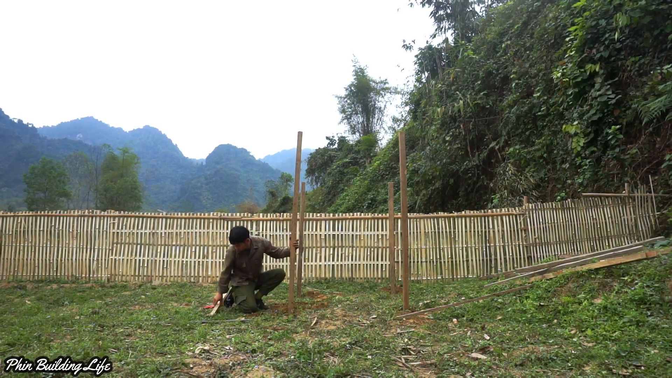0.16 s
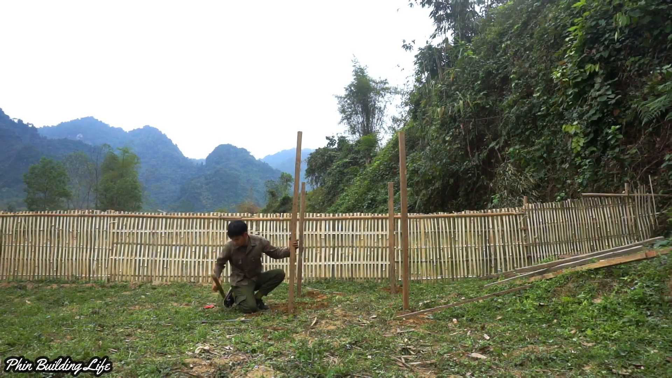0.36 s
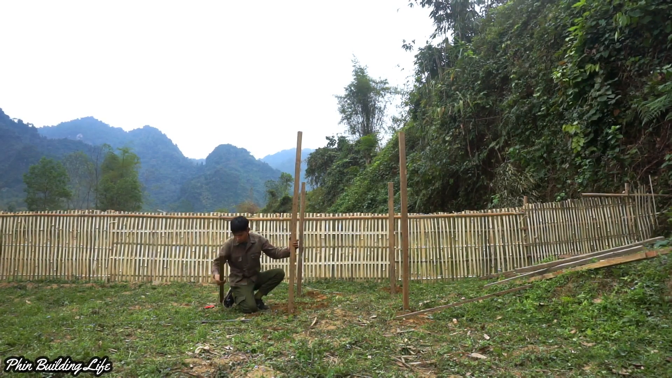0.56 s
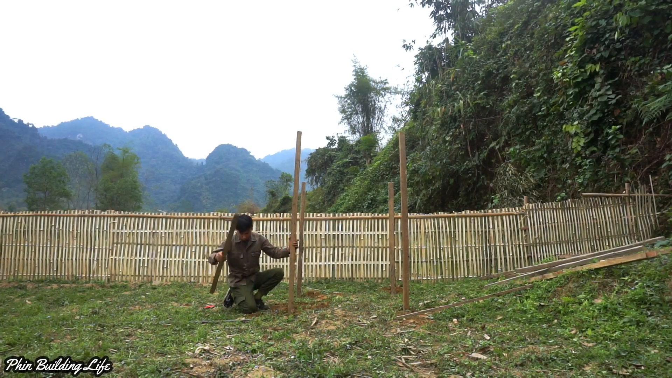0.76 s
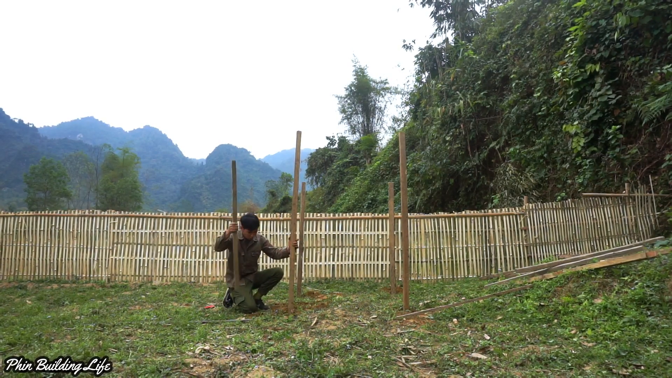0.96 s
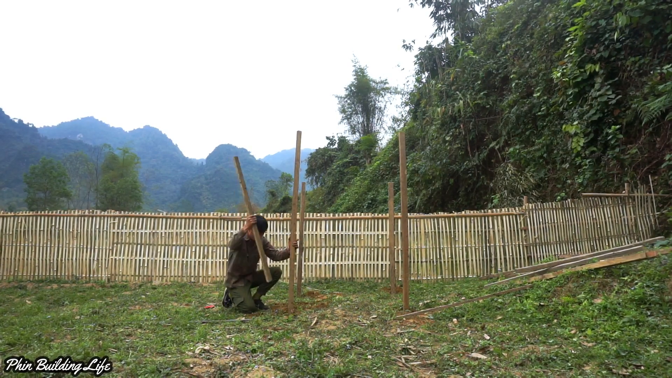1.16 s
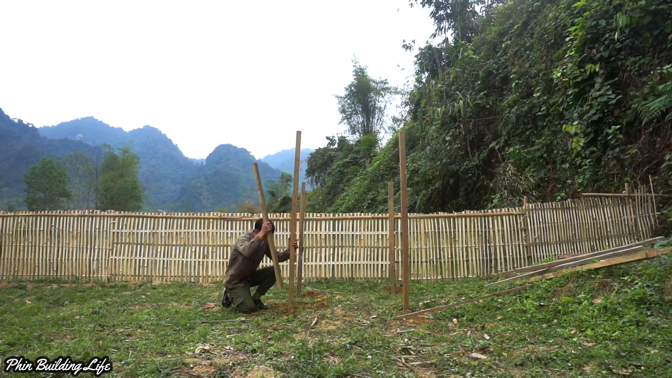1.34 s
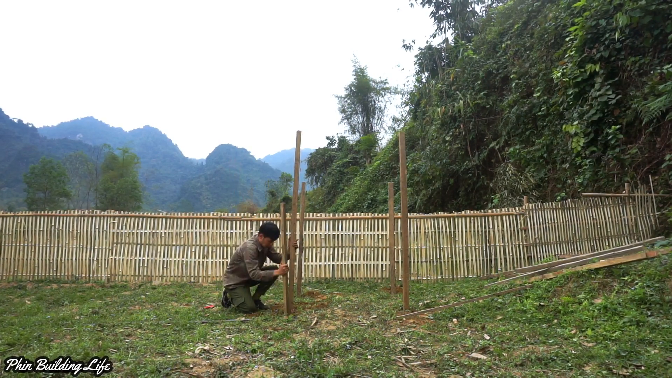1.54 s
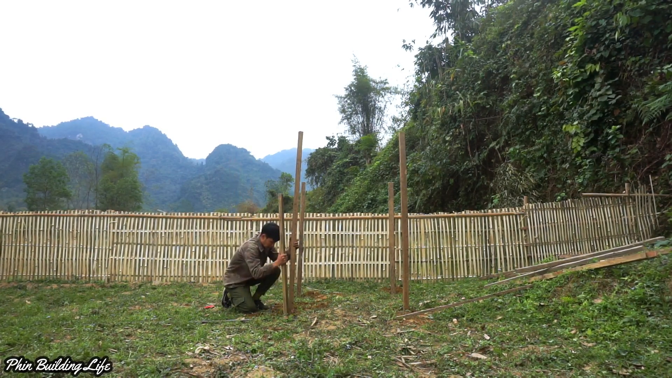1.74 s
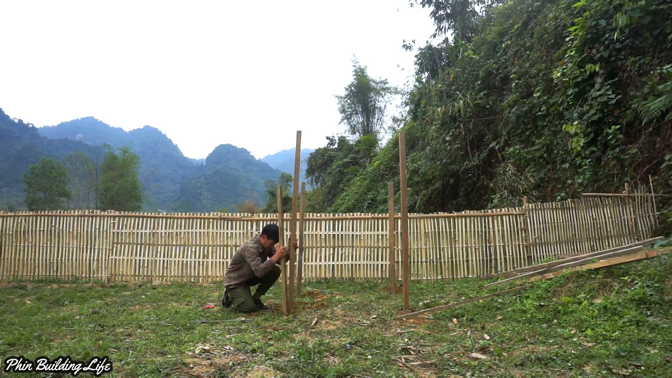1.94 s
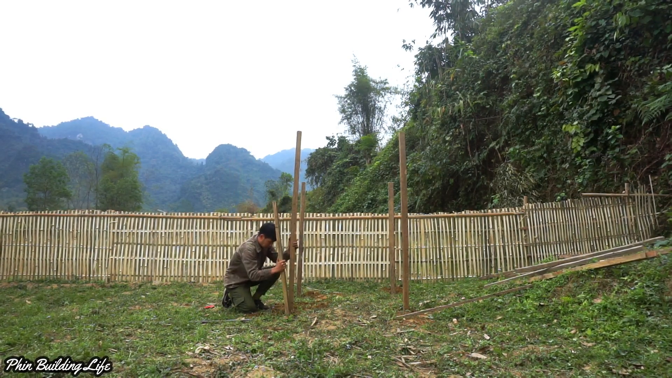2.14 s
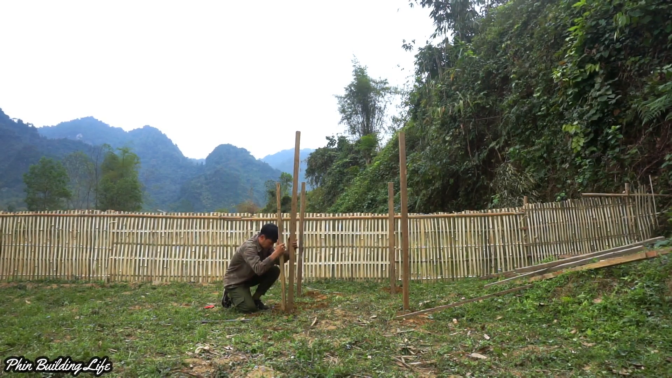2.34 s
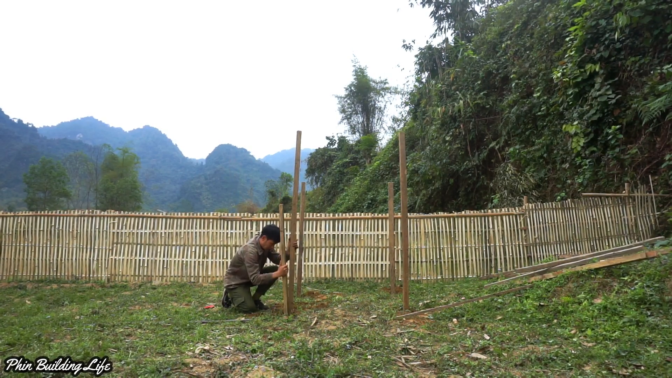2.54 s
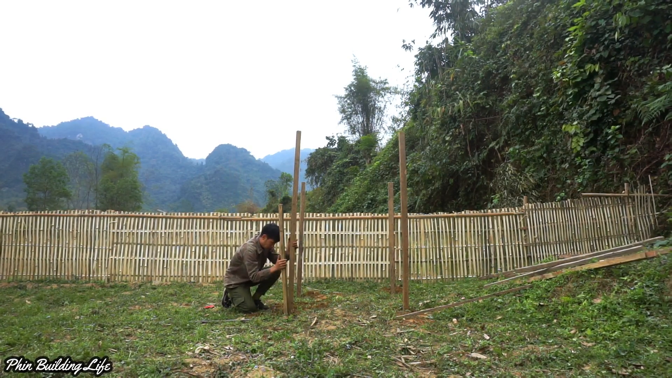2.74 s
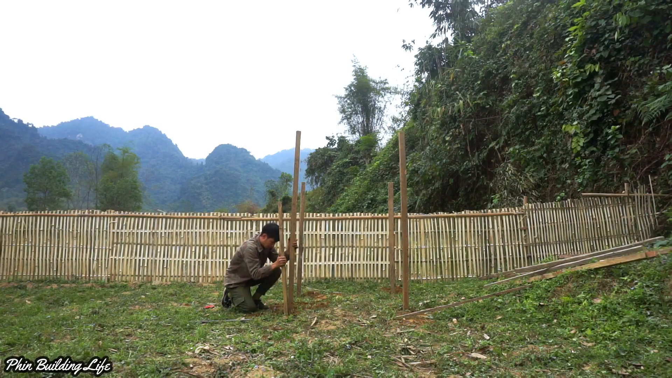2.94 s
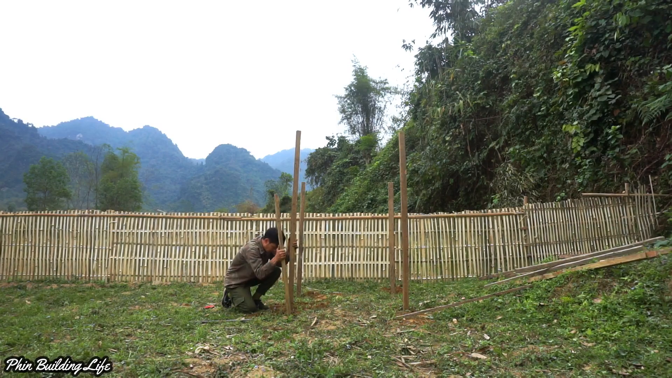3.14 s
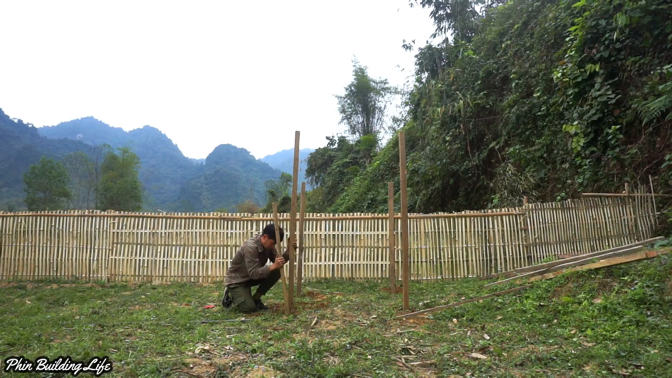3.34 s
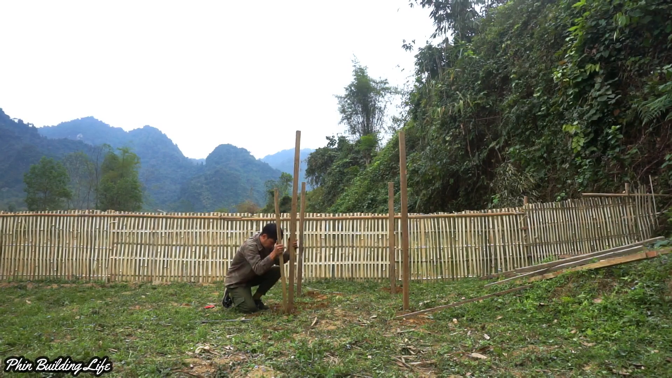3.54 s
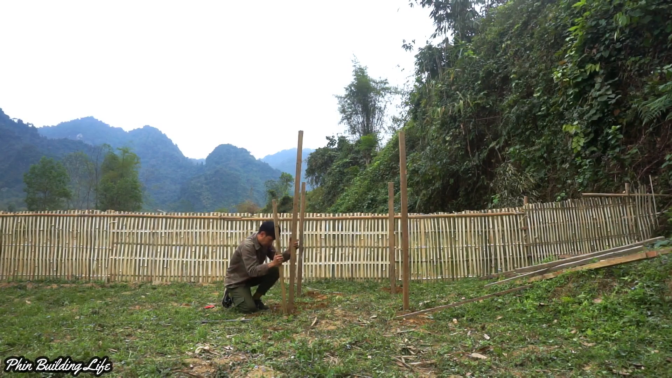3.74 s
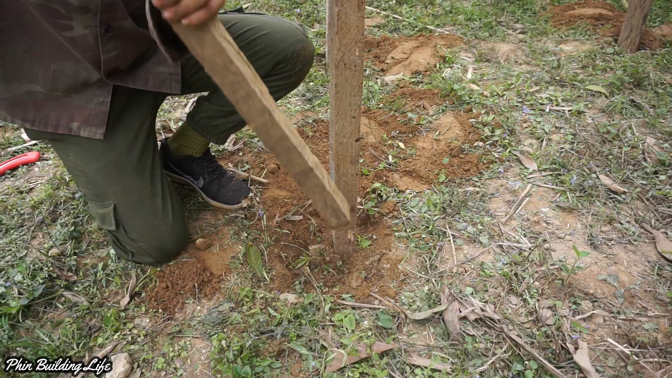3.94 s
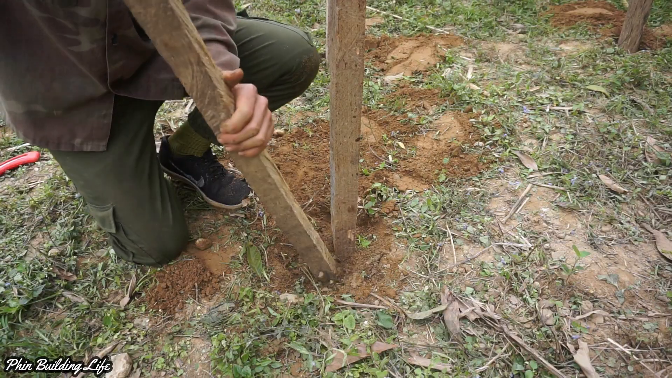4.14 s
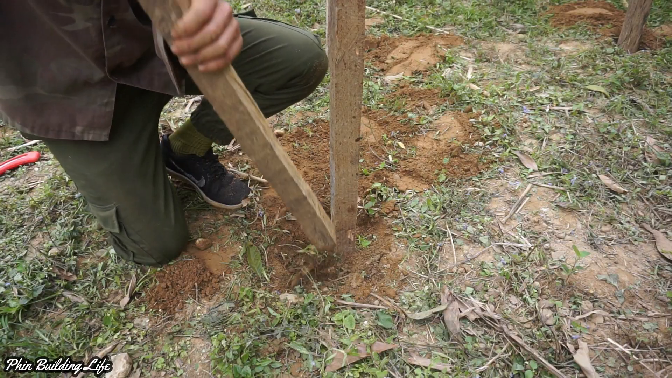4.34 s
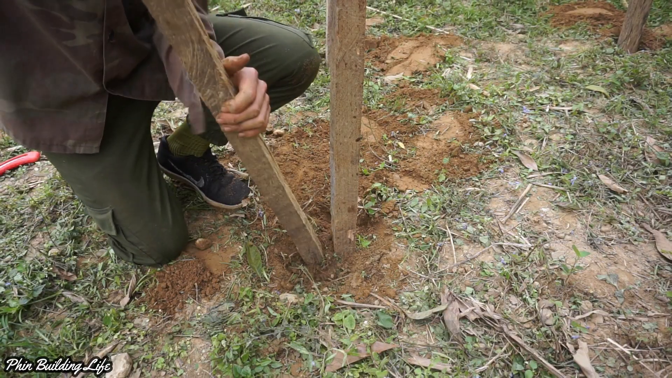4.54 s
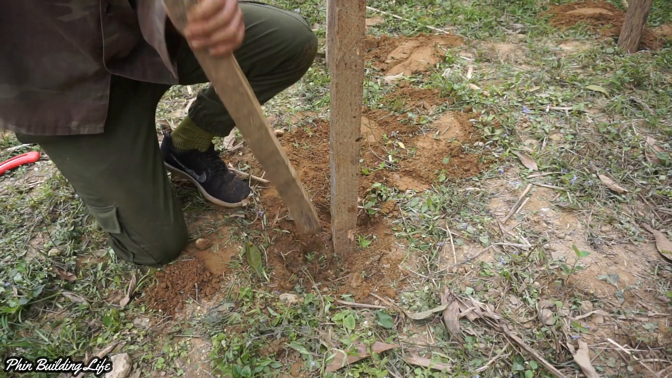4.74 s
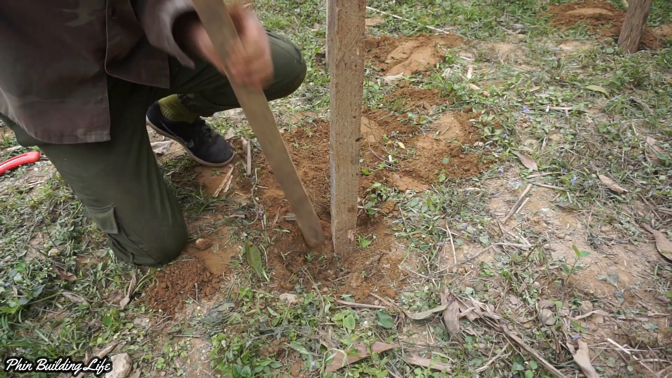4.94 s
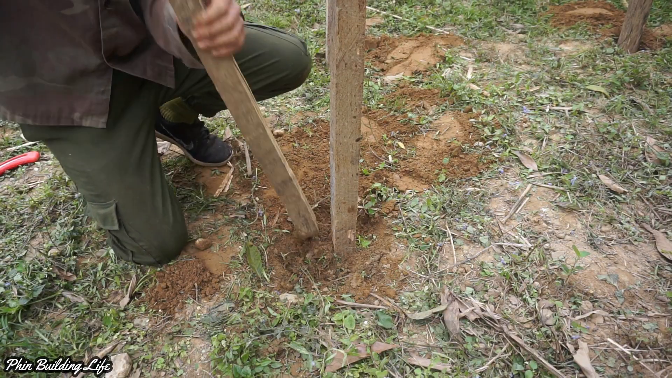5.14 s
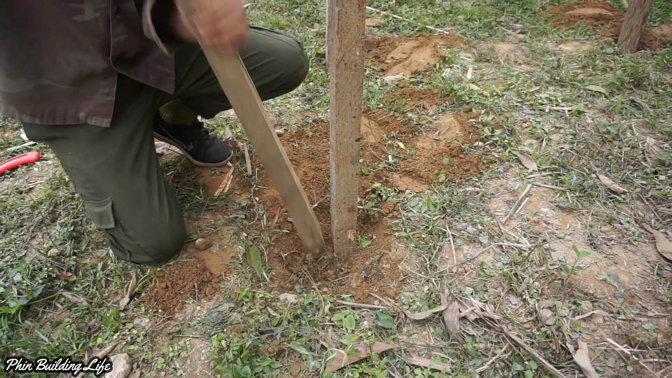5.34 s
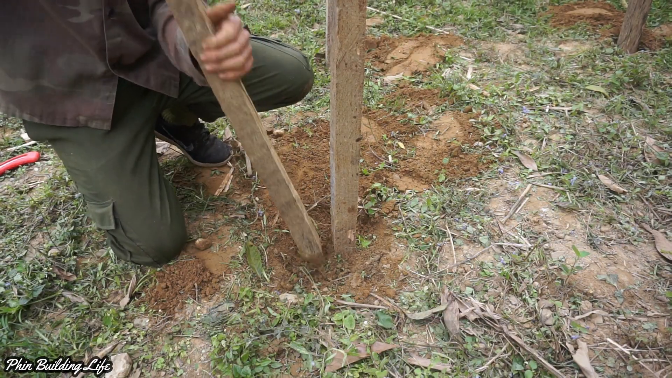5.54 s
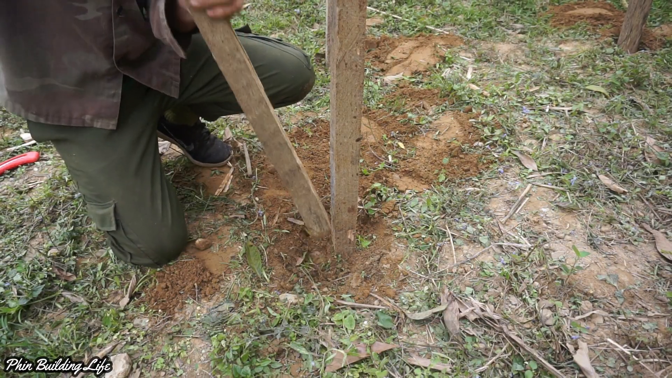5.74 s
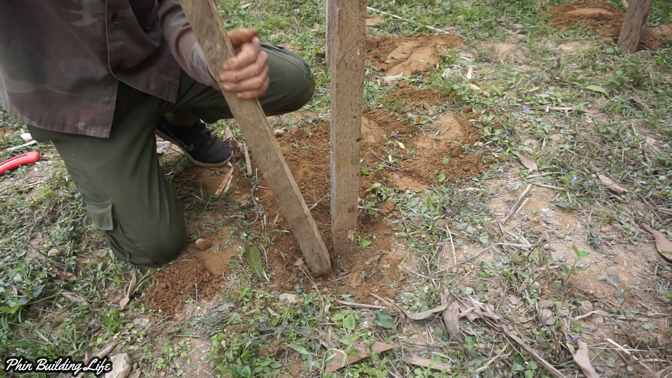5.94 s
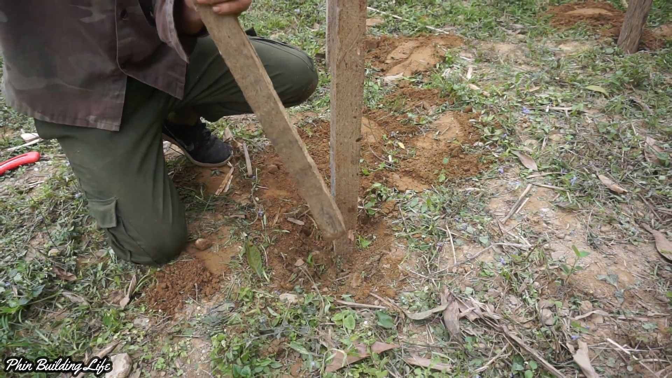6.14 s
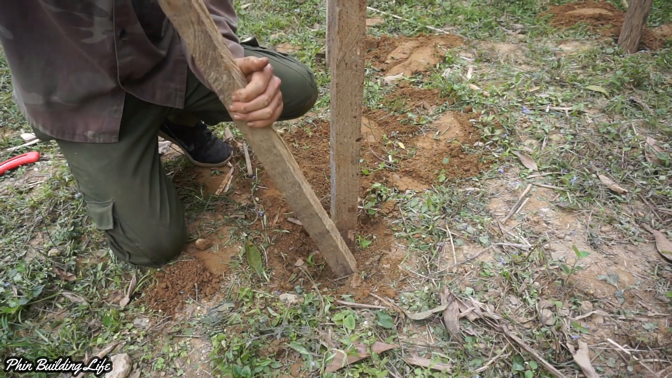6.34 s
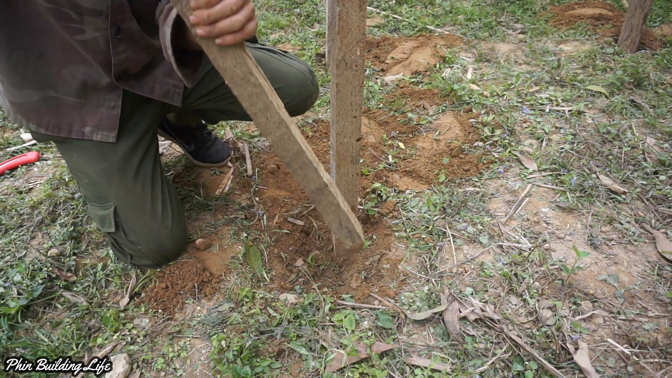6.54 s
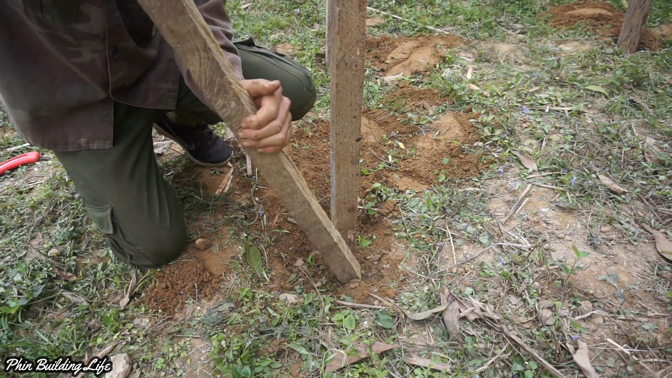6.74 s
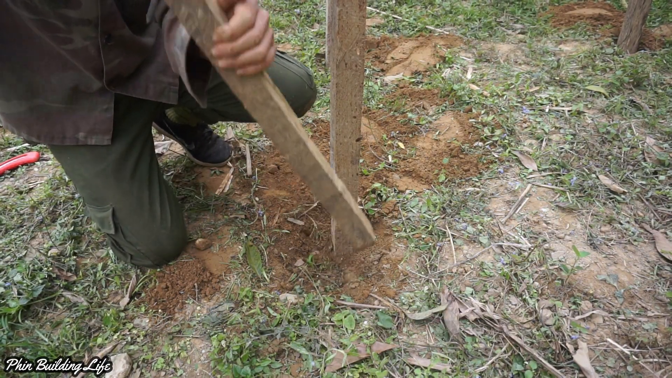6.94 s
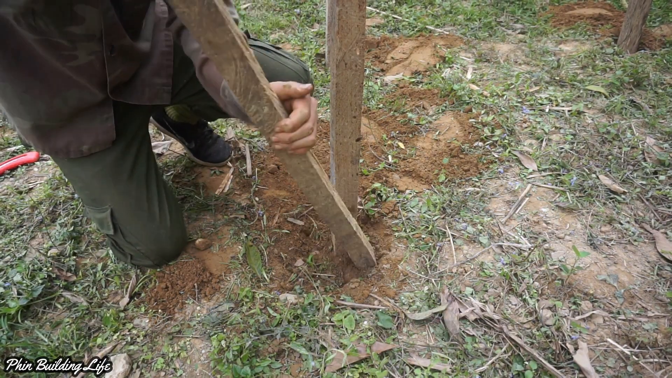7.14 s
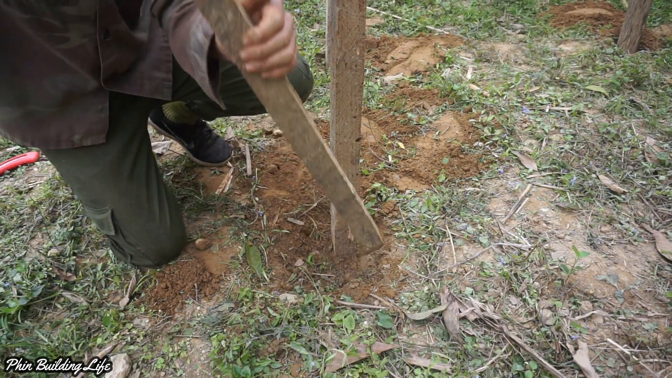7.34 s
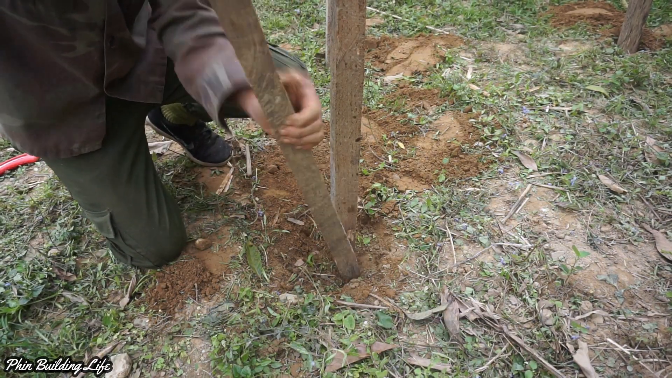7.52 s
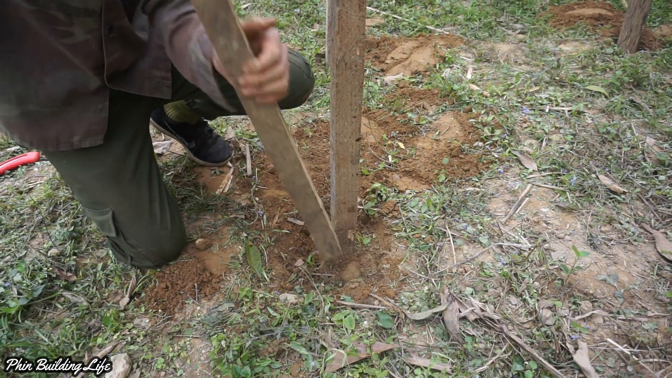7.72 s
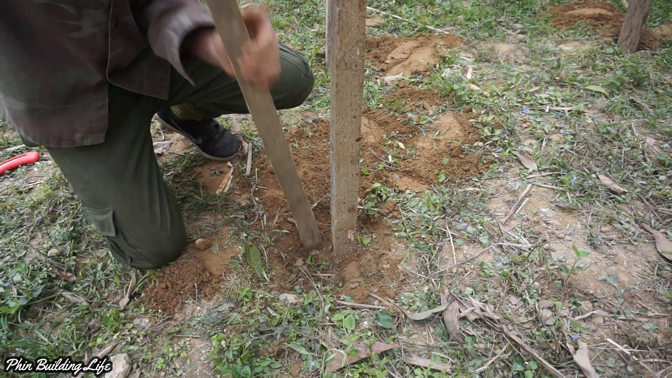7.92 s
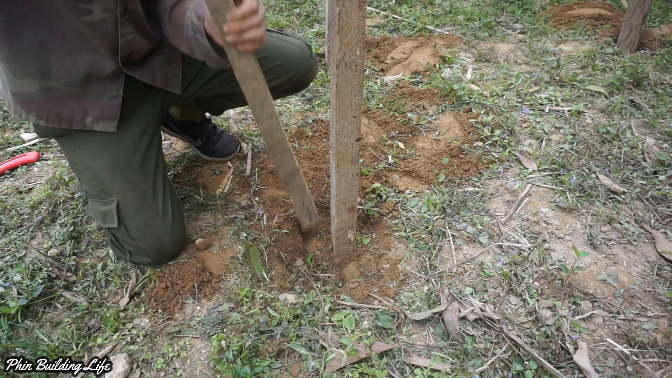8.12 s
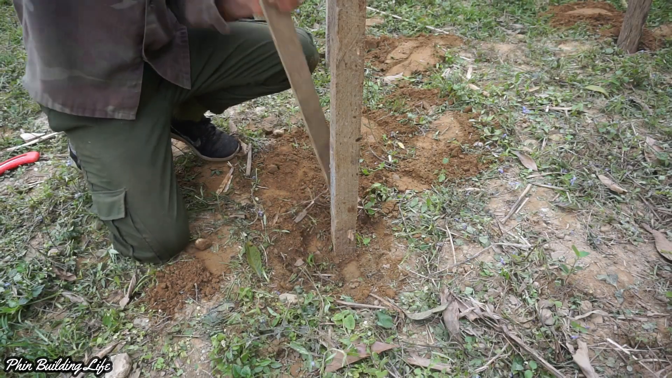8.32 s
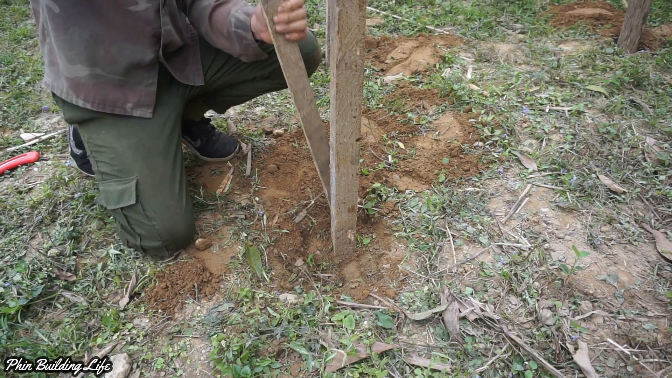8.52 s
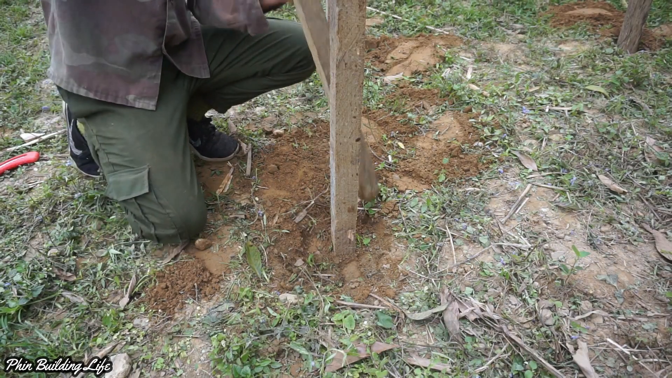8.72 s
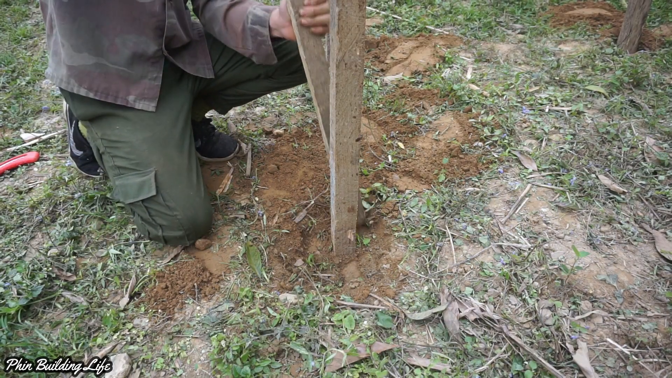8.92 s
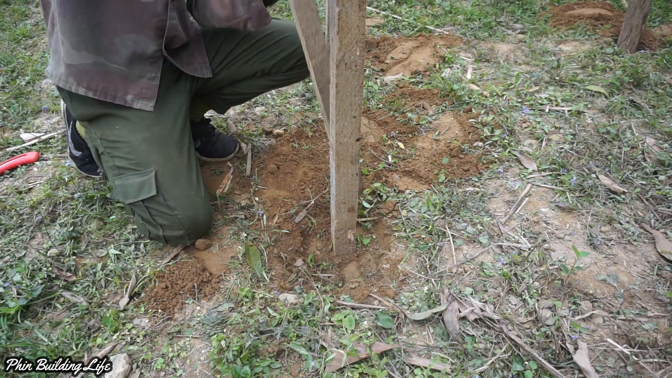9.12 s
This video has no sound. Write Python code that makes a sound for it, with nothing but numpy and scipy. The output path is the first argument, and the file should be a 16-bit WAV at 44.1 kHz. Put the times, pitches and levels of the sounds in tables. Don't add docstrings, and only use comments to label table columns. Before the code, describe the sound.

Faint distant taps in a quiet insect-filled field give way to close, heavy thuds of a stick tamping gritty earth, sometimes cracking against wood.

```python
import sys
import numpy as np
from scipy import signal
from scipy.fft import rfft, irfft, next_fast_len
from scipy.io import wavfile
from scipy.ndimage import uniform_filter1d

SR = 44100
rng = np.random.default_rng(int(sys.argv[2]) if len(sys.argv) > 2 else 0)


def nominal_scale(level):
    x = np.asarray(level, float) / 20
    return 10 ** x


def unload_audio(sound):
    columns = np.transpose(np.atleast_2d(sound))
    steps = np.round(np.clip(columns, -1, 1) * 32767)
    wavfile.write(sys.argv[1], SR, steps.astype(np.int16))


N = 404397
FAST = next_fast_len(N)

# hz, level_db
AIR = [(15, -45), (25, -5.5), (130, -3.5), (560, -7.5), (1300, -10), (3600, -15), (12900, -20.5),
       (16000, -23.5)]
# hz, correlation
AIR_SAME = [(60, 1), (130, 0.59), (290, -0.11), (640, -0.52), (1400, -0.51), (3100, -0.28), (6800, -0.0053)]
# time_s, treble_db
AIR_SWELL = [(0, -1), (1.4, -2.5), (2.2, -1), (3.9, -2), (4.3, 1), (5.3, 1), (6, -0.5), (7.5, -0.5),
             (8.2, 1), (9.17, -0.5)]
AIR_DB = -62

# time_s, level_db
CHORUS = [(0, -72), (1.3, -77), (1.7, -73), (2.63, -70), (3.75, -84), (4.01, -70), (4.31, -65.5),
          (5.0, -68.5), (6.3, -76), (6.9, -67), (7.41, -80), (8.2, -69), (8.6, -67), (9.17, -73)]
CHORUS_HZ = (4340, 3750)
CHORUS_WIDTH_HZ = (190, 150)
LOWER_STRAND_DB = -6
NEARER_S, SHIMMER_DB = 3.9, -73
KATYDID_S = [.83, 1.31, 1.79, 2.76, 5.17, 5.74, 8.53, 9.12]
KATYDID_HZ, KATYDID_DB = 11280, -77
# start_s, end_s, first_hz, last_hz, level_db
BIRD_CALLS = [
    (.1, .5, 1435, 1430, -76.5),
    (.6, 2.0, 1370, 1400, -77),
    (2.42, 2.76, 1085, 1056, -71.5),
]

# time_s, pitch_hz
CHIRP_HZ = [(0, 4010), (5, 3940), (5.8, 3930), (6.1, 3990), (6.6, 4035), (9.2, 4055)]
# first_chirp_s, last_chirp_s
PAIRS = [(.044, .421), (.581, .645), (.905, .905), (1.005, 1.07), (1.178, 1.263), (1.479, 1.564),
         (1.677, 1.677), (1.736, 1.961), (2.11, 2.11), (2.202, 2.276), (2.486, 2.549), (2.73, 2.73),
         (3.22, 3.3), (3.377, 3.467), (5.157, 5.37), (5.511, 5.802), (5.875, 6.173), (6.756, 6.837),
         (7.225, 7.465), (7.541, 7.776), (7.95, 8.025), (8.201, 8.354), (8.452, 8.535), (8.634, 9.12)]
# first_chirp_s, last_chirp_s
TRIPLES = [(.486, .486), (.732, .812), (2.327, 2.406), (2.672, 2.672), (6.249, 6.343), (6.448, 6.652),
           (6.928, 7.137), (7.853, 7.853), (8.102, 8.102)]
# time_s, right_peak_db
EFFORT = [(0, -60), (.25, -63), (.65, -59), (.93, -59), (1.1, -63), (1.8, -61), (2.2, -57), (2.43, -55.5),
          (2.7, -61), (3.3, -57), (5.1, -57.5), (5.6, -54.5), (6.12, -47.5), (6.5, -46), (7.3, -47),
          (8.5, -45.5), (8.7, -48.3), (9.17, -47.5)]
STROKE_S, PAUSE_S = .022, .056
FULL_DB, WEAK_START_DB_PER_DB, WEAKEST_DB = -47.5, 3., 7.

# peak_s, swell_s, fade_s, level_db, pitch_hz, width_hz
SLEEVE = (4.956, .03, .035, -45, 12500, 3500)
# peak_s, swell_s, fade_s, fine_grit_db, coarse_crumbs_db (re fine)
RUSTLES = [(.525, .04, .15, -66, -8), (.665, .08, .06, -68, -8), (1.786, .1, .02, -64, -9),
           (4.666, .012, .03, -54.5, -5), (4.862, .1, .2, -50.5, -6), (4.93, .02, .06, -44.5, -17),
           (4.945, .04, .05, -43, -20), (4.995, .05, .02, -53, 0.5), (5.09, .1, .4, -62, -2),
           (5.574, .07, .05, -62, -19), (6.02, .07, .08, -64, -13), (7.868, .08, .1, -59.5, -1),
           (8.162, .07, .09, -55.5, 1.5)]
RUSTLE_RANGE_DB = 25

# start_s, peak_db, pitch_hz, post_sway_db (re peak), post_ring_db (re peak)
THUMPS = [(1.621, -54, 210, -25, -9), (2.049, -51, 158, -15, -17), (2.087, -52.5, 213, -16, -6),
          (2.534, -51, 198, -16, -18), (3.262, -50, 211, -23, -14), (3.682, -58, 213, -15, -6),
          (4.131, -34, 112, -14, -25), (4.5615, -37.5, 120, -21, -26), (5.015, -41, 135, -12, -14),
          (5.44, -34, 200, -18, -26), (5.877, -35, 120, -8, -14), (6.318, -27, 130, -17, -14),
          (6.75, -50, 215, -1, -9), (7.152, -39.5, 175, -13, -18), (7.5895, -30, 160, -18, -14),
          (8.005, -46, 108, -2, -5), (8.4275, -35, 105, -13, -10), (8.8415, -36, 135, -13, -14)]
# pitch_hz, twin_hz, t60_s
POST = [(45, 53, .45), (140, 128, .6), (255, 232, .2)]
# start_s, peak_db, rise_s, pitch_hz
CLODS = [(1.625, -50, .0089, 480), (2.054, -41, .0051, 420), (2.075, -49, .012, 600),
         (2.089, -45, .0056, 410), (2.539, -45, .013, 440), (3.279, -43.5, .0071, 420),
         (3.683, -47, .0072, 430), (4.136, -29, .005, 480), (4.564, -30, .004, 390),
         (5.021, -51, .006, 794), (5.441, -24.5, .006, 340), (5.847, -30, .0055, 800),
         (5.879, -33, .008, 250), (5.881, -30, .011, 190), (5.848, -38, .006, 280), (4.134, -31, .009, 230),
         (6.738, -45, .01, 90), (5.442, -30, .012, 90), (8.43, -36, .012, 65), (8.842, -38, .01, 65),
         (4.565, -36, .009, 270), (8.4335, -33, .004, 400), (6.321, -25.5, .006, 320),
         (6.74, -42, .008, 400), (7.154, -36.5, .0075, 360), (7.592, -29, .008, 270),
         (7.592, -37, .004, 580), (7.619, -44, .0053, 750), (8.009, -42, .008, 260),
         (8.4325, -24, .005, 250), (8.8435, -30, .007, 265), (8.4335, -28, .002, 610),
         (8.434, -33, .003, 900), (6.729, -36, .005, 960), (8.008, -41, .005, 480),
         (8.8455, -31, .002, 600), (6.321, -36, .003, 600), (6.752, -40, .01, 340), (6.762, -41, .008, 250),
         (8.036, -45, .014, 165), (4.149, -36, .005, 450), (8.845, -37, .012, 95), (8.845, -33, .008, 200),
         (8.847, -38, .005, 410), (7.592, -33, .011, 100), (2.54, -45, .01, 310), (3.27, -48, .008, 750),
         (3.68, -52, .008, 700), (4.563, -37, .004, 790), (7.594, -38, .005, 1030)]
HARD_DB, HARD_RISE_S, SOFTER_S_PER_DB = -30, .0044, .00013
POST_BUILD_S, POST_FREE_S, OVERTONE_DB = .025, .135, -3

# start_s, push_s, fine_grit_db, coarse_crumbs_db, t60_s
CRUSH = [(1.578, .006, -49, -58, .074), (2.068, .027, -49, -50, .21), (2.537, .015, -51, -57, .15),
         (3.258, .027, -53.5, -52, .14), (3.665, .016, -48, -57, .17), (4.123, .018, -33, -37.5, .04),
         (4.554, .021, -35, -36.5, .034), (5.004, .02, -34.5, -44, .065), (5.434, .015, -34, -38.5, .07),
         (5.873, .013, -37, -37.5, .03), (6.31, .018, -39.5, -46, .028), (6.726, .018, -43, -45, .2),
         (7.15, .013, -44.5, -43, .15), (7.585, .014, -36, -37, .016), (7.996, .019, -40.5, -47, .065),
         (8.413, .024, -40, -40, .063), (8.824, .021, -39.5, -44, .09)]
# start_s, fine_grit_db, coarse_crumbs_db, t60_s
BOUNCES = [(1.588, -48, -55, .016), (1.614, -47.5, -54.5, .12), (3.241, -53, -72, .039),
           (4.153, -54, -45.5, .039), (4.256, -60, -54, .07), (4.578, -71, -51, .073),
           (5.846, -40, -39, .07), (5.894, -54, -65, .07), (5.92, -62, -60, .023), (6.335, -44.5, -50, .03),
           (7.612, -44, -43, .016), (7.648, -57, -53, .023), (8.042, -49, -55, .015),
           (8.863, -59, -60, .05)]
BOUNCE_PUSH_S = .005
# hz, level_db
GRIT = [(3500, 5.5), (5000, -1), (7000, -0.5), (10000, 0.5), (13000, 1.5), (16000, -4.5)]
# hz, level_db
CRUMBS = [(400, -17), (700, -9.5), (1000, -4), (1700, 1.5), (2500, -0.5), (4000, -4.5), (5500, -12.5),
          (8000, -46)]

# start_s, peak_db, loudest_mode_hz, tick_db (re peak),
# t60_s
CRACKS = [(2.537, -42, 1060, -20, .03), (6.728, -30, 1340, -23, .04), (6.7435, -36, 3000, -20, .03),
          (7.59, -31, 2200, -22, .03), (7.619, -30, 1680, -22, .024), (7.1668, -28, 1690, -30, .035),
          (5.0355, -38, 2600, -20, .014), (5.0165, -32, 4830, -8, .012), (4.5505, -42, 1800, -25, .02),
          (4.5655, -30, 1900, -25, .016), (4.5715, -29, 2000, -25, .02), (4.1515, -35, 4400, -20, .014),
          (4.1675, -37, 2200, -20, .014), (4.2615, -43, 1730, -18, .016),
          (4.1604, -28, 2100, -18, 0.013), (4.1946, -26, 1900, -28, 0.009),
           (4.199, -26.5, 1800, -28, 0.011), (5.443, -24.5, 1700, -25, .03), (5.0524, -46, 1890, -13, 0.01),
           (7.652, -35, 2170, -13, 0.016), (8.009, -38, 1750, -15, 0.03), (1.6008, -38, 4200, -12, 0.008),
           (4.5615, -34, 4350, -5, 0.02), (7.5956, -26, 4140, -21.5, 0.022),
           (7.6204, -31, 4200, -16, 0.025), (8.4208, -37, 4300, -9, 0.026)]
# mode_hz, level_db, t60_s
WOOD = [(1060, -19, 0.06), (1400, -8, 0.05), (1694, -3, 0.04), (2170, -7.5, 0.05), (3070, -11, 0.028),
        (3670, -6, 0.028), (4000, -4.5, 0.013)]
# mode_hz, level_db, t60_s, build_up_s
STICK = [(226, -16, .9, .02), (440, -2, 0.13, 0.001), (672, -1.5, 0.4, .012), (1010, -8, .3, .004),
         (1270, -8, .1, .001), (1430, -6, 0.2, .012), (1841, -8, 0.25, .006), (2260, -7, 0.3, .004)]
STICK_S, STICK_DB = .514, -51.5

# start_s, peak_db, tick_db (re peak), lag_s (at 1 kHz), rattle_db (re peak)
KNOCKS = [
    (2.0451, -31, -19, .0012, -13),
    (5.0224, -12.5, -14, .0008, -24),
    (5.8737, -14, -23, .0003, -20),
    (6.3197, -19.5, -31, .0003, -23),
    (7.1532, -14, -32, .0004, -23),
    (6.7383, -28.5, -28, .001, -18),
    (8.0006, -34.5, -11, .002, -16),
    (8.146, -51, -20, .004, -12),
]
# mode_hz, level_db, t60_s
LANDINGS = [
    [(620, -10, .04), (1000, -8, .05), (1373, -3, .05), (1733, -3, .05), (2207, 0, .03), (2584, -1, .035),
     (3000, -5, .035), (3526, -8, .03), (4226, -5, .03)],
    [(1001, -14, .024), (1300, -23, .02), (1710, 1, .025), (2000, 1, .013), (2570, -9, .018),
     (2912, -9, .02), (3225, -6, .018), (3720, -10, .011), (4300, -10, .011), (4750, -14, .01)],
    [(673, -12, .02), (985, -16, .025), (1430, -6, .045), (1884, -9, .018), (2169, 1, .018),
     (2498, -7, .018), (3095, -6, .017), (3440, -11, .015), (4000, -8, .018), (4452, -12, .015)],
    [(549, -9, .022), (1017, 0, .019), (1453, -10, .028), (1690, -8, .026), (2121, -12, .025),
     (2627, -16, .025)],
    [(689, -18, .018), (980, -21, .02), (1294, -6, .024), (1686, 2, .025), (2170, -6, .017),
     (2500, -11, .018), (2772, -11, .017), (3430, -10, .018), (3730, -11, .016), (4000, -8, .018)],
    [(980, -5, .03), (1340, -1, .03), (1710, -2, .07), (2190, -4, .04), (2570, -4, .03), (3000, -3, .045),
     (3900, -5, .015)],
    [(1400, -13, .03), (1730, 0, .07), (2090, -5, .035), (2580, -7, .035), (3060, -6, .05),
     (3300, -3, .025), (4060, -6, .03)],
    [(1000, -2, .12), (1390, 0, .1), (3050, -3, .12)],
]
CONTACT_S, LINGER_DB = .0008, -13

# hz, left_lead_rad, left_minus_right_db
PORTS = [(60, 0.18, 0), (200, 0.67, -0.7), (694, 1.38, -1), (2000, 1.3, -3.5), (4550, 1.09, -1.5),
         (10000, 0.7, -6)]


def evened(x):
    return x / np.sqrt(np.mean(x ** 2) + 1e-20)


def read(points, hz, column=1):
    table = np.transpose(points)
    return np.interp(np.log(hz + 1), np.log(table[0] + 1), table[column])


def follow(curve, time_s):
    return np.interp(time_s, *np.transpose(curve))


def seconds(length_s):
    return np.arange(round(length_s * SR)) / SR


def add(mix, start_s, sound):
    part = mix[round(start_s * SR):][:len(sound)]
    part += sound[:len(part)]


def coloured(x, gain):
    return irfft(rfft(x, FAST) * gain(np.fft.rfftfreq(FAST, 1 / SR)), FAST)[..., :N]


def band(x, low_hz, high_hz):
    b, a = signal.butter(2, [low_hz / SR * 2, high_hz / SR * 2], "bandpass")
    return evened(signal.lfilter(b, a, x))


def click(low_hz, high_hz, length):
    shape = band(signal.unit_impulse(length), low_hz, high_hz)
    return shape / abs(shape).max()


def ring(hz, t60_s, phase=0., length_s=.5):
    t = seconds(length_s)
    return nominal_scale(-60 * t / t60_s) * np.sin(2 * np.pi * hz * t + phase)


def whistle(hz, width_hz):
    return evened(coloured(rng.standard_normal(N), lambda f: 1 / (1 + ((f - hz) / width_hz * 2) ** 4)))


def grains(spectrum, per_s, spread_db, low_hz, high_hz, cycles):
    size = nominal_scale(spread_db * np.minimum(rng.exponential(1, N), 3)) * rng.standard_normal(N)
    size *= rng.random(N) < per_s / SR
    kind, out = rng.integers(0, 16, N), np.zeros(N)
    for k, hz in enumerate(np.geomspace(low_hz, high_hz, num=16)):
        radius, turn = nominal_scale(-60 * hz / cycles / SR), 2 * np.pi * hz / SR
        resonance = [1, -2 * radius * np.cos(turn), radius * radius]
        poles = np.convolve(resonance, resonance)
        grain = signal.lfilter([1], poles, signal.unit_impulse(1024))
        gain = np.sqrt(hz) / np.linalg.norm(grain)
        out += signal.lfilter([gain], poles, size * (kind == k) + 1e-18)
    return evened(coloured(out, lambda f: nominal_scale(read(spectrum, f))))


def air():
    frames, hz = N // 256 + 5, np.fft.rfftfreq(1024, 1 / SR)
    a, b, c, d, patches = rng.standard_normal((frames, 513, 5)).T
    patches = uniform_filter1d(patches, 12, 0)
    patches = evened(uniform_filter1d(patches, 14, 1))
    swell_db = follow(AIR_SWELL, np.arange(frames) * 256 / SR)
    same = np.clip(read(AIR_SAME, hz), -1, 1)[:, None]
    left = a + 1j * b
    right = same * left + np.sqrt(1 - same ** 2) * (c + 1j * d)
    treble_db = np.outer(np.clip(hz / 5000, .3, 1), swell_db)
    z = np.array([left, right]) * nominal_scale(read(AIR, hz)[:, None] + 0.55 * patches + treble_db)
    return nominal_scale(AIR_DB + 3.5) * evened(signal.istft(z, nperseg=1024, noverlap=768)[1][:, :N])


def chorus():
    t = np.arange(N) / SR
    level = nominal_scale(follow(CHORUS, t)) * (1 + 0.19 * np.sin(2 * np.pi * 41 * t))
    out = np.zeros((2, N))
    for side in out:
        upper, lower = (whistle(hz, width) for hz, width in zip(CHORUS_HZ, CHORUS_WIDTH_HZ))
        side += level * (upper + nominal_scale(LOWER_STRAND_DB) * lower)
    shimmer = nominal_scale(SHIMMER_DB - 2.5 * t) * (t < NEARER_S) * whistle(4010, 330)
    return out + nominal_scale([[-6], [0]]) * shimmer


def katydids():
    gate = np.zeros(N)
    for start_s in KATYDID_S:
        add(gate, start_s, signal.windows.tukey(round(.09 * SR), .4))
    return nominal_scale(KATYDID_DB) * gate * whistle(KATYDID_HZ, 150)


def bird_calls():
    out = np.zeros(N)
    for start_s, end_s, first_hz, last_hz, db in BIRD_CALLS:
        hz = np.linspace(first_hz, last_hz, round((end_s - start_s) * SR))
        call = np.sin(2 * np.pi * np.cumsum(hz) / SR) * signal.windows.tukey(len(hz), .5)
        call *= 1 + .5 * evened(uniform_filter1d(rng.standard_normal(len(hz)), size=900))
        add(out, start_s, nominal_scale(db) * call)
    return out


def cricket():
    out, t = np.zeros(N), seconds(.015)
    chirps = []
    for strokes, bouts in ((2, PAIRS), (3, TRIPLES)):
        beat_s = PAUSE_S + (strokes - 1) * STROKE_S
        for first_s, last_s in bouts:
            count = round((last_s - first_s) / beat_s) + 1
            chirps += [(s, strokes) for s in np.linspace(first_s, last_s, count)]
    for start_s, strokes in chirps:
        hz, db = follow(CHIRP_HZ, start_s), follow(EFFORT, start_s)
        weaker_db = np.clip(WEAK_START_DB_PER_DB * (FULL_DB - db), 0, WEAKEST_DB)
        for k in range(strokes):
            pulse = np.sin(2 * np.pi * (hz * 1.025 * t - 6500 * t ** 2) + 6 * rng.random())
            pulse *= 1 + 0.11 * np.sin(2 * np.pi * (150 * t + rng.random()))
            stroke_db = db + rng.normal(0, 1.0) - (k == 0 and start_s > NEARER_S) * weaker_db
            pulse *= signal.windows.tukey(len(t), .6)
            add(out, start_s + k * STROKE_S - .0075, nominal_scale(stroke_db) * pulse)
    echo = np.roll(out, round(.031 * SR))
    return nominal_scale([[-15], [0]]) * out + nominal_scale([[-20], [-16]]) * echo


def sleeve():
    peak_s, swell_s, fade_s, db, hz, width_hz = SLEEVE
    u = np.arange(N) / SR - peak_s
    return nominal_scale(db - RUSTLE_RANGE_DB * np.maximum(-u / swell_s, u / fade_s)) * whistle(hz, width_hz)


def rustle_levels():
    swish, slide = np.zeros(N), np.zeros(N)
    for peak_s, swell_s, fade_s, grit_db, rel_db in RUSTLES:
        u = np.arange(-swell_s, fade_s, 1 / SR)
        level = nominal_scale(grit_db - RUSTLE_RANGE_DB * np.maximum(-u / swell_s, u / fade_s))
        add(swish, peak_s - swell_s, level)
        add(slide, peak_s - swell_s, nominal_scale(rel_db) * level)
    return swish, slide


def crush_levels():
    t, grit, crumbs = seconds(.4), np.zeros(N), np.zeros(N)
    bounces = [(s, BOUNCE_PUSH_S, *rest) for s, *rest in BOUNCES]
    for start_s, push_s, grit_db, crumbs_db, t60_s in CRUSH + bounces:
        after = np.maximum(t - push_s, 0)
        dig = np.minimum(t / push_s, 1)
        stop = .75 * nominal_scale(-60 * after / (.35 * t60_s)) + .25 * nominal_scale(-60 * after / (2.2 * t60_s))
        fall = stop + nominal_scale(-25.5 - 60 * after / 0.48)
        add(grit, start_s, nominal_scale(grit_db) * dig ** .8 * fall)
        add(crumbs, start_s, nominal_scale(crumbs_db) * dig ** .6 * fall)
    return grit, crumbs


def soil():
    (grit, crumbs), (swish, slide) = crush_levels(), rustle_levels()
    noise = rng.standard_normal(N)
    smooth = evened(coloured(noise, lambda f: nominal_scale(read(CRUMBS, f)) * np.minimum(f / 3000, 1)))

    def fine_grit():
        x = grains(GRIT, 18000, 2.2, 4000, 15000, 6)
        return grit * x + swish * evened(np.diff(x, prepend=0))

    coarse = (crumbs + .4 * slide) * grains(CRUMBS, 8000, 2.0, 700, 6000, 11)
    return coarse + .8 * slide * smooth + .85 * fine_grit(), .45 * fine_grit()


def thumps():
    out, t = np.zeros(N), seconds(.5)
    for start_s, db, hz, sway_db, ring_db in THUMPS:
        phase, twin_phase = rng.random(2) * 2 * np.pi
        rise_s = HARD_RISE_S + SOFTER_S_PER_DB * (HARD_DB - db)
        swell = t / rise_s * np.exp(1 - t / rise_s)
        lumps = band(rng.standard_normal(len(t)), 60, 273)
        push = swell * (0.3 * lumps - np.sin(2 * np.pi * hz * t))
        after = nominal_scale(-11.5 - 60 * t / 0.27) * lumps
        free = (1 - np.exp(-t / POST_BUILD_S)) ** 2 / (1 + (t / POST_FREE_S) ** 8)
        levels_db = (sway_db, ring_db, ring_db + OVERTONE_DB)
        for level_db, shape, (f, twin_hz, t60_s) in zip(levels_db, (1, free, free), POST):
            uneven = .45 * nominal_scale(-60 * t / t60_s) * band(lumps, .8 * f, 1.25 * f)
            pair = ring(f, t60_s, phase) + 0.22 * ring(twin_hz, .7 * t60_s, twin_phase)
            after += nominal_scale(level_db) * shape * (pair + uneven)
        add(out, start_s, nominal_scale(db) * (push + (1 - np.exp(-t / rise_s)) * after))
    return out


def clods():
    out, t = np.zeros(N), seconds(.5)
    for start_s, db, rise_s, hz in CLODS:
        tail = nominal_scale(-27 - 60 * t / 0.2) * (1 - np.exp(-t / rise_s))
        swell = t / rise_s * np.exp(1 - t / rise_s) + tail
        rough = .45 * band(rng.standard_normal(len(t)), 0.71 * hz, 1.82 * hz)
        clod = swell * (rough - np.sin(2 * np.pi * hz * t))
        add(out, start_s, nominal_scale(db - 5.5) * clod / abs(clod).max())
    return out


def stick_ring():
    out, t = np.zeros(N), seconds(.5)
    stick = 0
    for hz, db, t60_s, build_s in STICK:
        pair = ring(hz, .85 * t60_s) + .4 * ring(hz * rng.uniform(1.02, 1.05), .6 * t60_s)
        stick = stick + nominal_scale(db) * pair * (1 - np.exp(-t / build_s))
    add(out, STICK_S - .004, nominal_scale(STICK_DB) * stick)
    return out


def cracks():
    out, t = np.zeros(N), seconds(.1)
    onset = np.sin(np.pi / 2 * np.minimum(t / .0007, 1)) ** 2
    for start_s, db, hz, tick_db, t60_s in CRACKS:
        body = ring(hz, .95 * t60_s, length_s=.1) + nominal_scale(-18) * ring(.985 * hz, 2.1 * t60_s, length_s=.1)
        for f, mode_db, decay_s in WOOD:
            a, b = rng.random(2)
            level = nominal_scale(mode_db - 5 * a - 4 * abs(np.log2(f / hz)))
            body = body + level * ring(f * (.97 + .06 * b), decay_s * t60_s / .045, length_s=.1)
        noise = rng.standard_normal(len(t))
        snap = .5 * click(.75 * hz, 2.5 * hz, len(t))
        snap += nominal_scale(-9 - 60 * t / (.5 * t60_s)) * band(noise, .85 * hz, 1.7 * hz)
        tick = click(5000, 15000, len(t)) + nominal_scale(-8 - 60 * t / .011) * band(noise, 5000, 15000)
        add(out, start_s, nominal_scale(db) * (onset * (body / abs(body).max() + snap) + nominal_scale(tick_db + 6) * tick))
    return out


def knocks():
    out, t = np.zeros(N), seconds(.12)
    for (start_s, db, tick_db, lag_s, rattle_db), modes in zip(KNOCKS, LANDINGS):
        body = 0
        for hz, mode_db, t60_s in modes:
            late_s = lag_s * 1000 / hz
            u = np.maximum(t - late_s, 0)
            onset = np.sin(np.pi / 2 * np.minimum(u / (CONTACT_S + late_s), 1)) ** 2
            decay = nominal_scale(-60 * u / (.8 * t60_s)) + nominal_scale(LINGER_DB - 60 * u / (1.9 * t60_s))
            body = body + nominal_scale(mode_db) * onset * decay * np.cos(2 * np.pi * hz * (u - CONTACT_S))
        noise = rng.standard_normal(len(t))
        rattle = nominal_scale(rattle_db - 60 * t / .045) * band(noise, 1200, 4600) * np.minimum(t / CONTACT_S, 1)
        tick = click(4200, 15000, len(t)) + nominal_scale(-8 - 60 * t / .011) * band(noise, 4200, 15000)
        tick = np.roll(tick, round(CONTACT_S * SR / 2))
        add(out, start_s, nominal_scale(db) * (body / abs(body).max() + rattle + nominal_scale(tick_db + 6) * tick))
    return out


def ports(x):
    def half(hz):
        return np.exp(.5j * read(PORTS, hz)) * nominal_scale(read(PORTS, hz, column=2) / 2)
    return coloured(x, lambda hz: half(hz) ** np.array([[1], [-1]]))


def yard(x):
    t = seconds(.25)
    tail = rng.standard_normal((2, len(t))) * (rng.random((2, len(t))) < .3)
    tail *= nominal_scale(-60 * t / .18) * (t > .003)
    return signal.oaconvolve(x[None], tail / np.linalg.norm(tail[0]), axes=1)[:, :N]


def scene():
    field = air() + chorus() + katydids() + bird_calls() + cricket()
    direct, scattered = soil()
    wood = cracks() + stick_ring() + knocks()
    work = ports(nominal_scale(1.5) * (direct + wood + sleeve()) + thumps() + clods())
    work += nominal_scale([[1], [4]]) * scattered * np.array([[1], [-1]])
    work += nominal_scale(-24) * yard(wood + direct)
    return field + work


def band_limit(x):
    return signal.sosfilt(signal.butter(12, 16980, fs=SR, output="sos"), x)


def record(dry):
    edge = signal.firwin(2047, 15970, window=("kaiser", 9), fs=SR)
    mix = signal.oaconvolve(dry, edge[None], "same")
    return band_limit(mix)


dry = scene()
out = record(dry)
unload_audio(out)
```